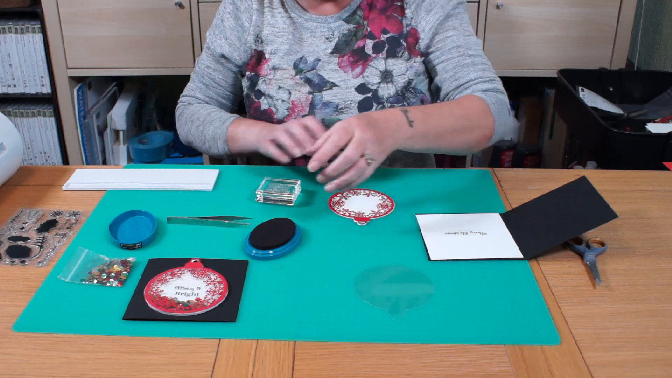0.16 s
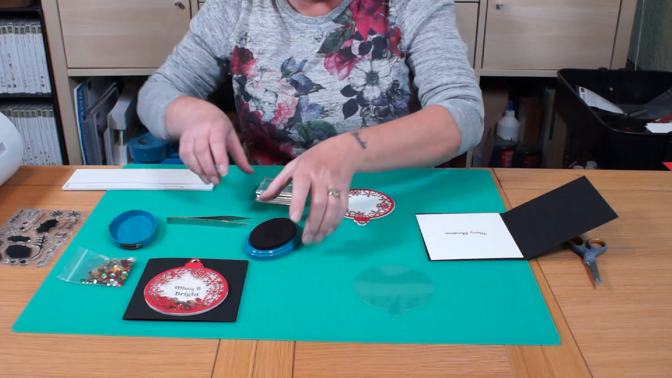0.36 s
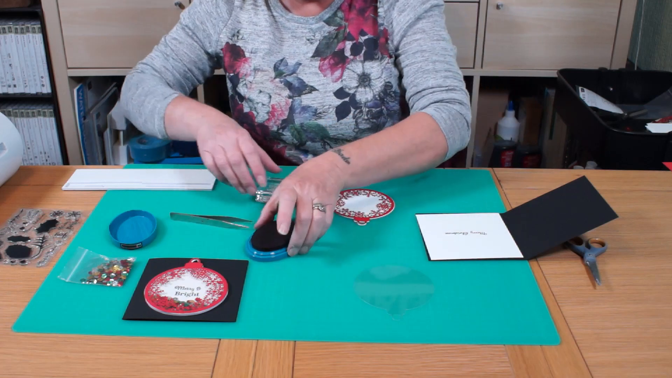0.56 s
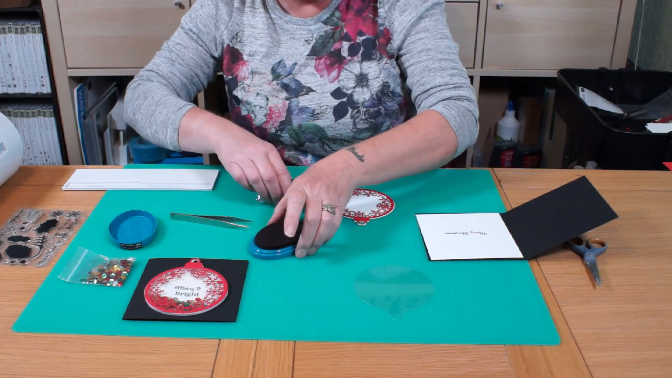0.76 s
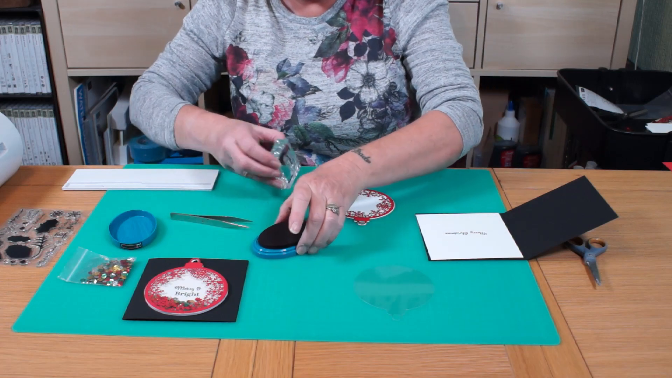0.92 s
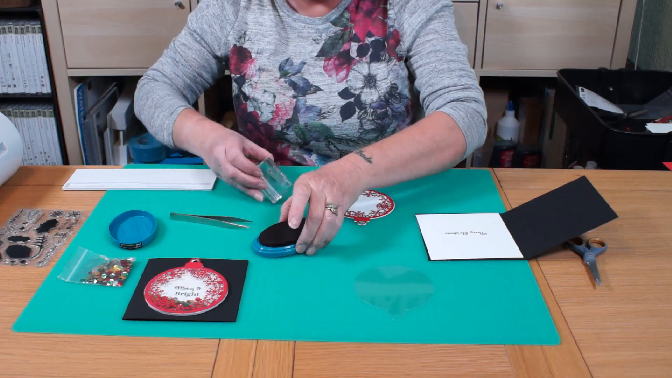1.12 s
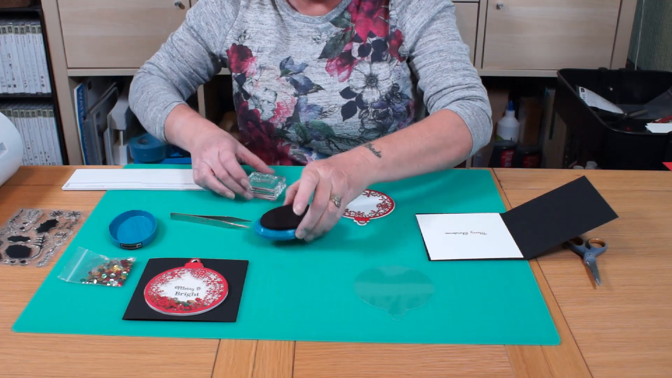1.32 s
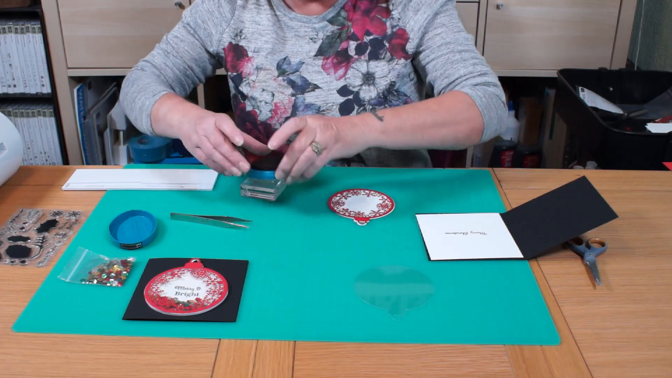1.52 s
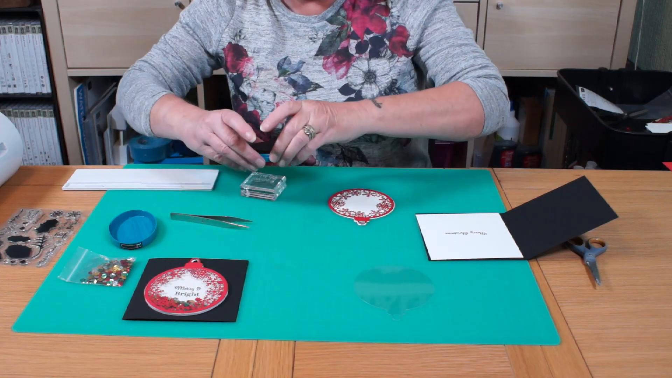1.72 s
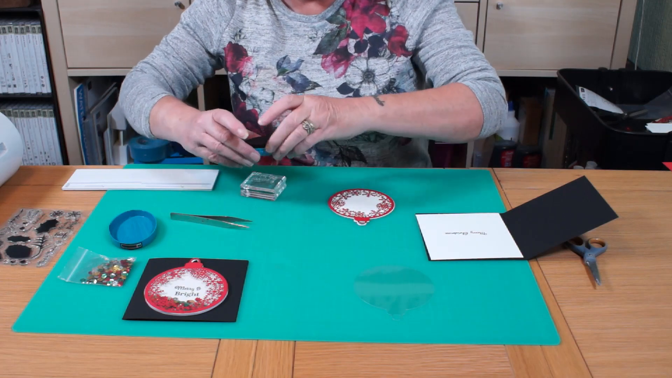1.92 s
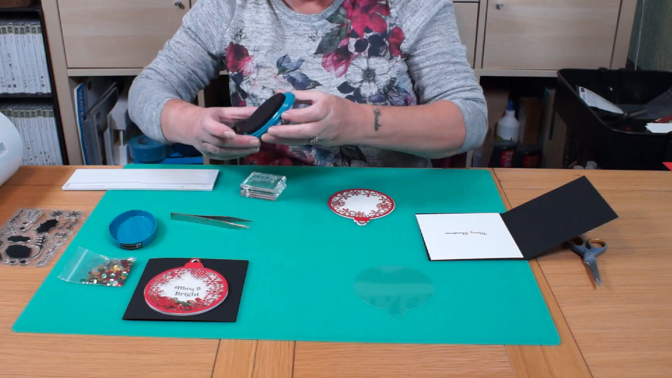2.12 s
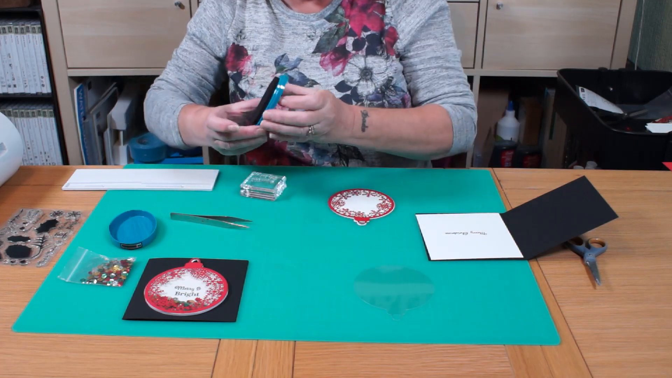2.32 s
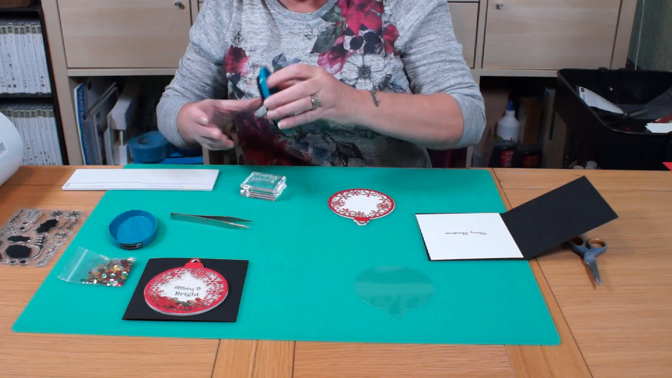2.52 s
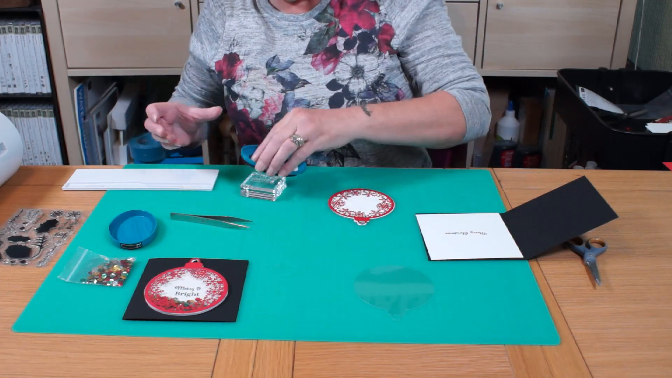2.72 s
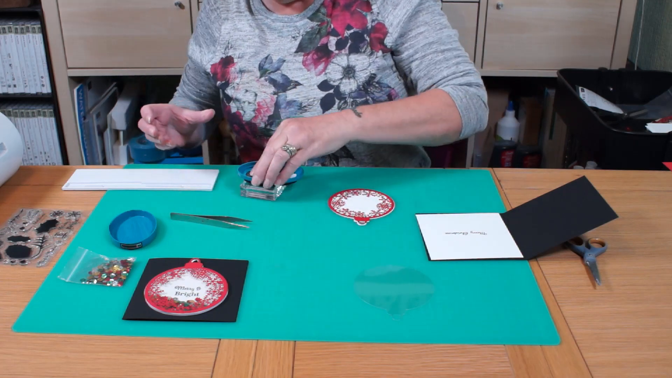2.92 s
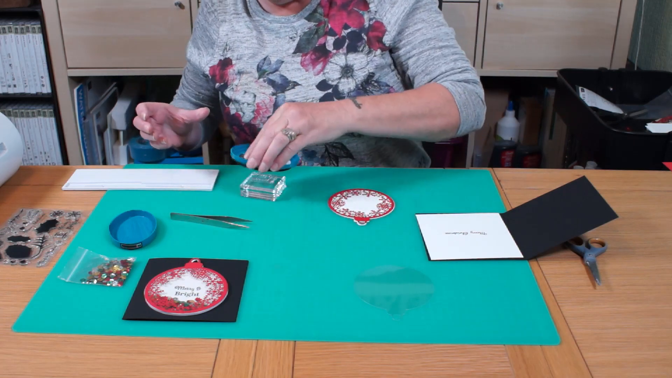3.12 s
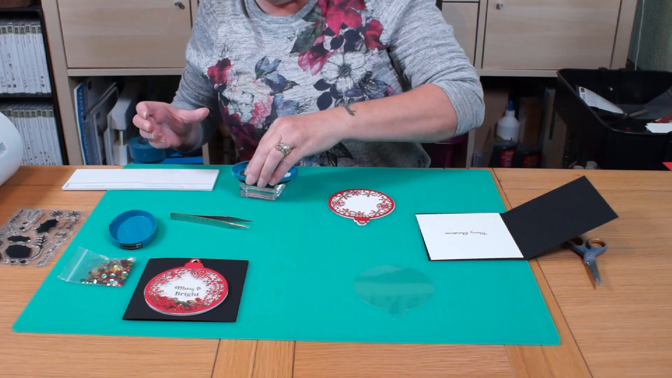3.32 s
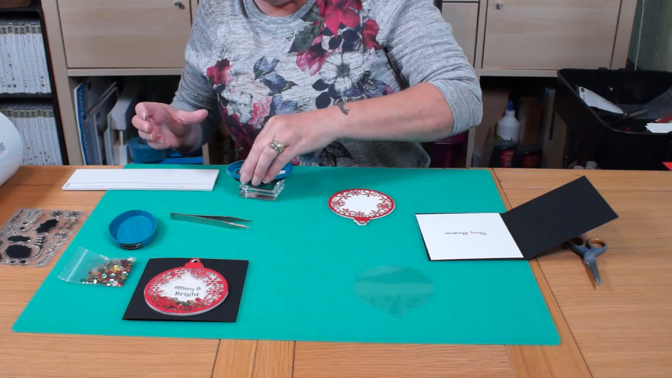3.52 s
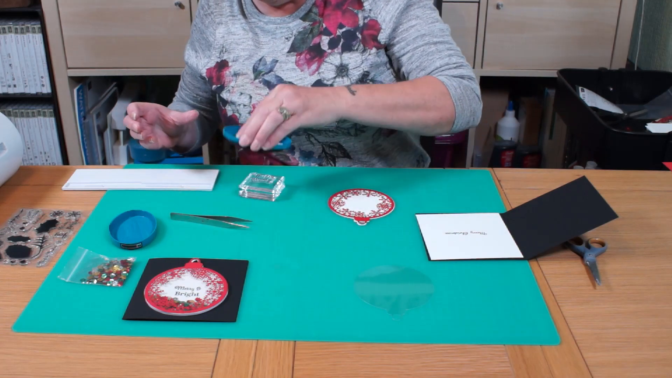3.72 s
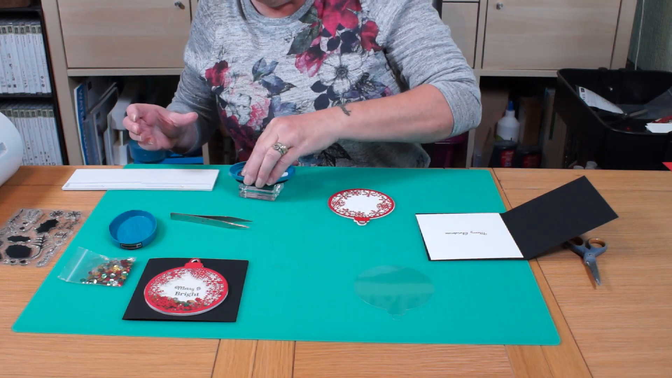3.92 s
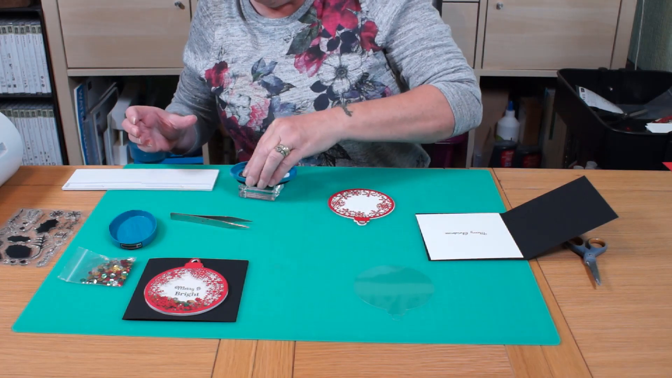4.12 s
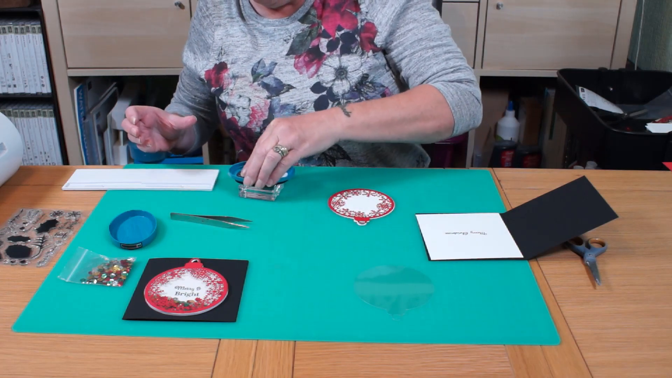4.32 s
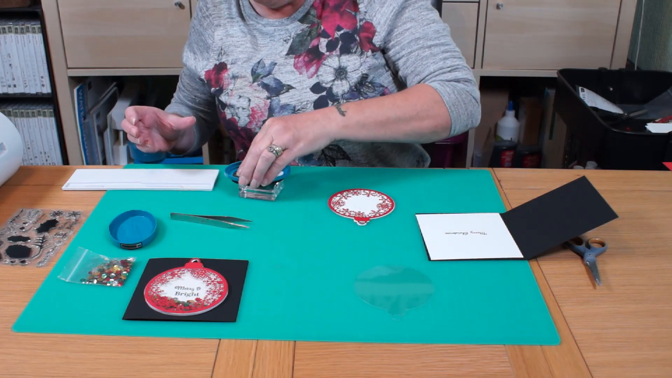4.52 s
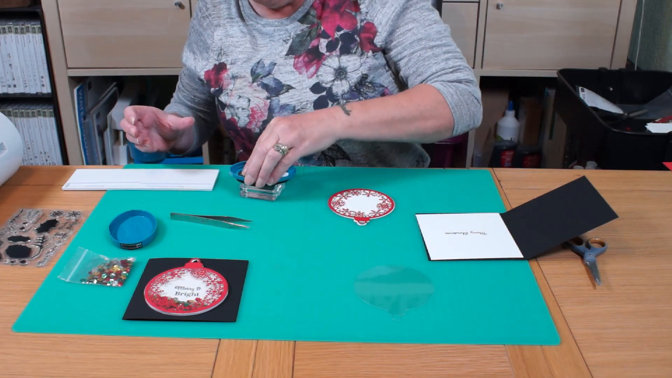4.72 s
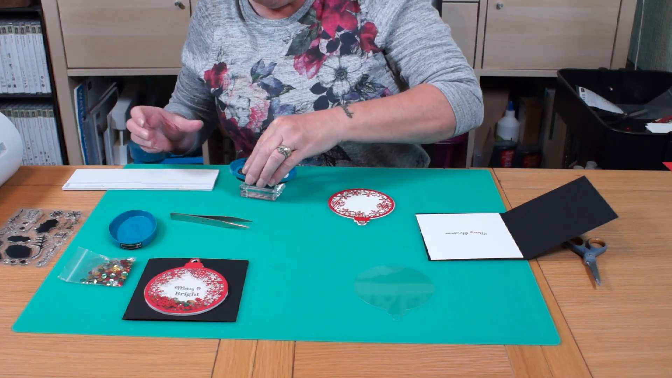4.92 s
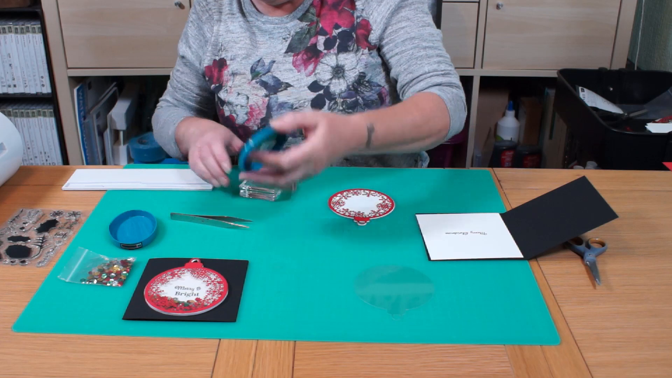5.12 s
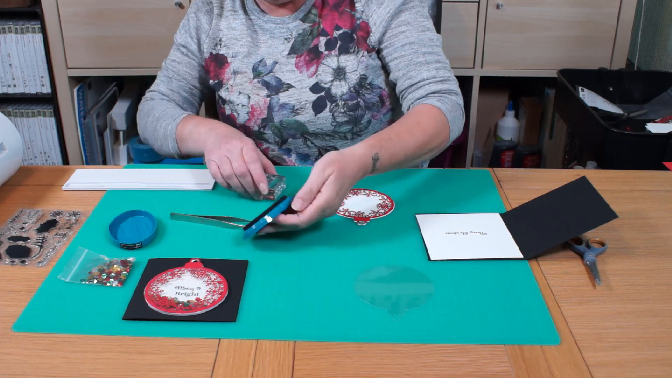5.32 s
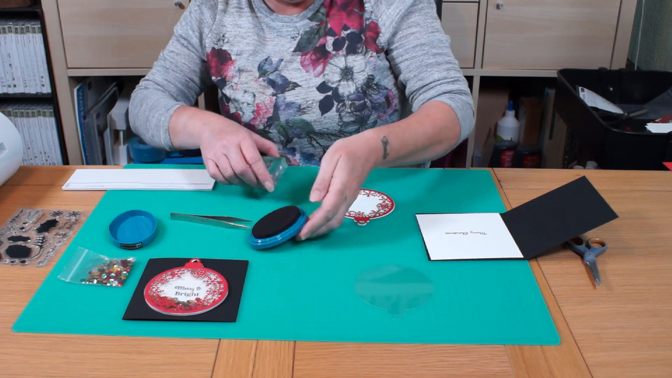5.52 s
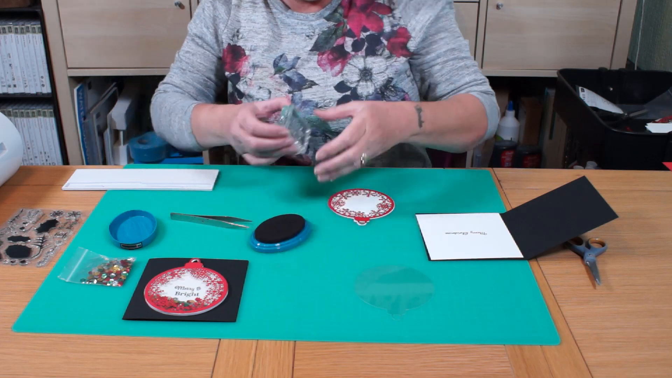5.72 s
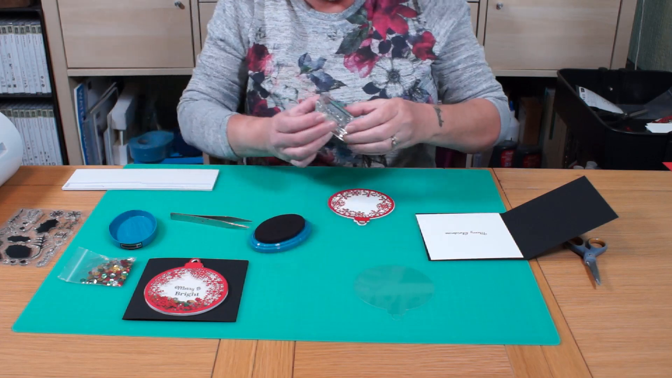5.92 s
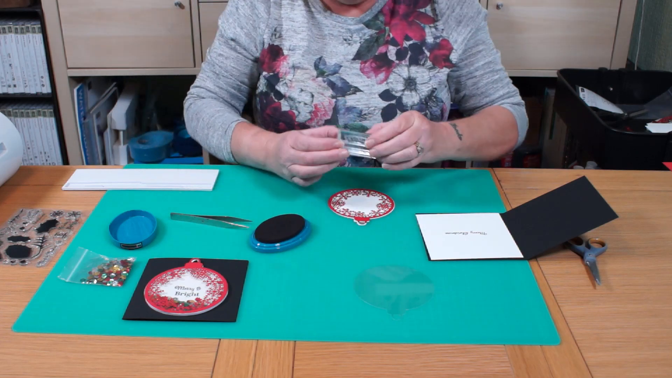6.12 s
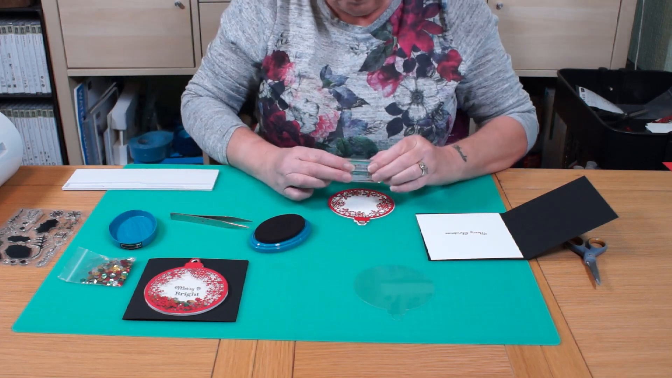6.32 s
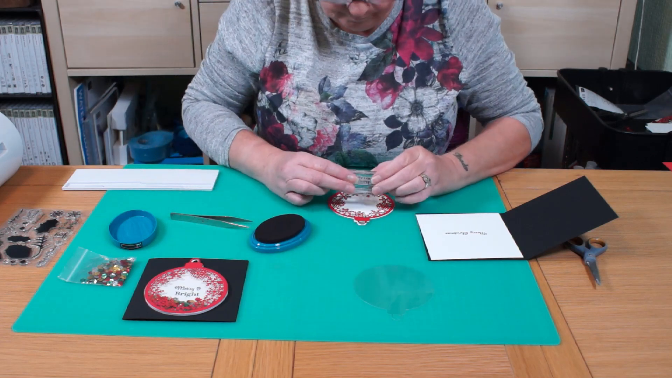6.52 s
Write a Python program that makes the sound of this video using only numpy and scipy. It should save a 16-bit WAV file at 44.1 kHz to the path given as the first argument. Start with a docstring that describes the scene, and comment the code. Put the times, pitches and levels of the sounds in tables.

```python
"""Over a faint room hush, fingers scrape and fumble with plastic at a craft table in a small, furnished room.
An ink pad and a clear acrylic stamp block are knocked down on the mat, then the pad is dabbed nine times
on the block. The pad drops and bounces, a fingertip squeaks on the acrylic, and the block is lifted.
Each blow draws a low, booming thud from table and room and a short clack from the plastic; the scrapes
are sprays of tiny friction slips."""
import sys
import numpy as np
from scipy import signal
from scipy.fft import rfft, irfft
from scipy.io import wavfile
from scipy.ndimage import uniform_filter1d

SR = 44100
rng = np.random.default_rng(int(sys.argv[2]) if len(sys.argv) > 2 else 0)


def transcribe(signal):
    """Save signal, clipped to [-1, 1], as a 16-bit WAV file at the path in sys.argv[1]."""
    frames = np.atleast_2d(signal).T
    limited = np.clip(frames, -1, 1)
    pcm = np.round(limited * 32767).astype(np.int16)
    wavfile.write(sys.argv[1], SR, pcm)


N = 289188

# Room rumble and microphone hiss. Each row: frequency in Hz, relative level in dB.
HUSH_COLOUR = [(15, -65), (25, -25), (69, -19.5), (101, -2.5), (124, -8.5), (178, -7), (296, -3.5),
               (336, -7), (518, -8.5), (603, -5.5), (668, -10), (862, -6.5), (1140, -10.5), (1760, -11),
               (11000, -22.5), (14300, -115), (22000, -120)]
# Stereo width of the hush. Each row: frequency in Hz, left-right correlation.
HUSH_CORRELATION = [(60, 1), (300, 0.23), (1000, 0.12), (3000, 0.05), (9000, 0.12)]
# Plastic pushed over the mat or scraped by fingers. Each row: peak time and length in seconds, level in dB.
SLIDES = [(0.024, 0.036, -41), (0.632, 0.068, -42.5), (0.794, 0.072, -50), (0.894, 0.054, -43.5),
          (5.36, 0.11, -48.5), (5.731, 0.035, -37.5), (6.0, 0.11, -60)]
# Tone of the friction. Each row: frequency in Hz, relative level in dB.
FRICTION_COLOUR = [(80, -35), (200, -3), (450, 4), (900, -1.5), (1800, -2.5), (3000, -8), (5000, -16),
                   (10000, -30)]
# Fingers and sleeves brushing about. Each row: start and end in seconds, level in dB.
FUMBLES = [(0.05, 0.6, -68), (5.55, 5.72, -57), (5.95, 6.55, -67)]
# Resonances of the table and the room together, heard as a low thud with a lingering boom.
# Each row: frequency in Hz, relative level in dB, 60 dB decay time in seconds.
THUD_RESONANCES = [(39, -17.5, 0.58), (66, -9.5, 0.42), (99.7, -18, 0.21), (155, -10.5, 0.18),
                   (178, -9.5, 0.17), (204, -16, 0.2), (236, -6, 0.085), (293, 2.5, 0.135),
                   (326.5, -9, 0.068), (341, 2, 0.085), (443.4, -10, 0.22), (515, -11, 0.23),
                   (570.3, -15, 0.24), (860, -16, .14), (974.3, -13, 0.13), (1135, -12, 0.12)]
# Tone of the plastic for each kind of contact. Each row: frequency in Hz, relative level in dB.
CLACK_COLOURS = {"dab": [(150, -37), (300, -6.5), (450, 6), (650, 1), (900, -1.5), (1250, 1.5), (1600, -7),
                 (2000, -10), (2400, -18), (2900, -22.5), (3600, -29), (4500, -35.5), (6500, -44),
                 (11000, -58)], "pad rim": [(55, -56), (110, -17), (200, -13.6), (380, -5.5), (600, -6),
                 (900, -4), (1400, -1.7), (1900, 2), (2500, -6.0), (3200, -16.5), (4200, -18.5),
                 (5500, -23), (7500, -31.5), (11000, -40.5)], "pad flat": [(40, -39), (80, -12.5),
                 (140, -7), (300, 1.5), (520, -1), (800, -8.5), (1150, -5), (1650, -4.5), (2100, -5.5),
                 (2800, -7.5), (3900, -10.5), (4800, -16.5), (7000, -20.5), (11000, -32)],
                 "block flat": [(40, -65), (80, -44), (150, -8), (330, -5), (520, -3.4), (750, -4.5),
                 (1000, -2.9), (1330, -4.5), (1700, -17), (2300, -17.1), (2900, -24.5), (4000, -24.5),
                 (6000, -34), (11000, -54)], "block edge": [(55, -46), (110, -9), (220, -8), (480, 1.5),
                 (750, -6), (1100, -7), (1450, -5), (1900, 1.2), (2350, -7), (2800, -17.5), (3800, -16.5),
                 (4800, -27.5), (7000, -30.5), (11000, -47)], "block corner": [(50, -60), (100, -17),
                 (200, -11.2), (400, -7), (650, -13), (950, 2.2), (1250, -2), (1700, -9.5), (2400, -9.5),
                 (3100, -15.5), (4200, -18.5), (5800, -28.9), (7800, -30), (11000, -43)]}
# Sharper rings of the plastic for each contact. Each row: frequency and width in Hz, boost or cut in dB.
CLACK_RINGS = {"dab": [(1300, 66, 1), (1910, 153, 1.5), (1850, 210, 4), (2450, 160, 4)],
               "pad rim": [(382, 28, 6), (1800, 190, -2), (4120, 83, 5)], "pad flat": [(1580, 75, 5),
               (2970, 110, 6.5), (3770, 250, 2.5)], "block flat": [(530.3, 50, 2), (970, 60, 0),
               (1210, 110, 3.5)], "block edge": [(1420, 66, 6), (1900, 110, -1.5), (2470, 180, 5)],
               "block corner": [(1010, 46, 0), (1260, 260, 4.5), (2480, 120, 9)]}
# Handling knocks. Each row: start in seconds, thud level in dB, clack level in dB, kind of contact.
KNOCKS = [(0.5607, -48.5, -53.5, "pad flat"), (0.6460, -48, -26.5, "pad rim"),
          (0.7669, -50, -51.5, "block flat"), (1.1420, -29.5, -24, "block flat"),
          (1.3335, -33.5, -29, "block edge"), (5.4179, -31, -24.5, "pad flat"),
          (5.6816, -43.5, -31, "block corner")]
# Landings after a knock. Each row: start in seconds, clack level in dB.
BOUNCES = [(1.1632, -37), (1.1850, -42), (5.4402, -42), (5.4690, -31.3), (5.6920, -42), (5.7200, -37.5),
           (5.7410, -39)]
# Dabs of the pad. Each row: start in seconds, thud level in dB, rim clack in dB relative to the thud
# (low when the pad lands flat on its felt).
DABS = [(2.9055, -36.5, -1.5), (3.2779, -28.7, -4), (3.5179, -30.7, -11), (3.9198, -32.5, -11),
        (4.1596, -26.5, -5), (4.3438, -32.5, -5.5), (4.5390, -33, -13), (4.756, -29.3, -6.5),
        (4.9172, -33.5, -4.5)]
# First reflections off the table and furniture. Each row: delay in seconds, left gain, right gain.
REFLECTIONS = [(.0007, 0.34, 0.33), (.0019, 1, 0.19), (.0033, 0.68, 1), (.0056, .4, 0.24),
               (.0105, 0.23, 0.46), (.0165, .3, 0.38), (.0215, .35, .25)]
# Length of the room's tail. Each row: frequency in Hz, 60 dB decay time in seconds.
ROOM_T60 = [(100, 0.44), (300, 0.2), (800, .24), (2000, 0.205), (5000, 0.27), (10000, 0.21)]
# Stereo width of the tail. Each row: frequency in Hz, left-right correlation.
ROOM_CORRELATION = [(60, 0.86), (300, 0.92), (600, 0.58), (1500, 0.48), (4000, 0.43), (9000, 0.2)]
# Stereo lean of the action. Each row: frequency in Hz, left minus right in dB.
BALANCE = [(60, 0.5), (150, -5), (330, 0.5), (650, -1.3), (1400, 1.5), (3000, 0.2), (9000, 0)]

RING_SAMPLES = 32768


def gain_of(db):
    """Decibels to amplitude."""
    return 10 ** (np.asarray(db) / 20)


def unit_rms(x):
    """Scales to an rms of one."""
    return x / np.sqrt(np.mean(x ** 2) + 1e-20)


def unit_blow(x):
    """Scales a blow so that its energy, spread over a twentieth of a second, has an rms of one."""
    return x / np.sqrt(np.sum(x ** 2) * 20 / SR + 1e-20)


def curve_at(points, hz):
    """Reads a curve along a log-frequency axis."""
    point_hz, value = np.transpose(points)
    return np.interp(np.log(hz + 1), np.log(point_hz + 1), value)


def add(mix, start_s, sound):
    """Mixes a sound in at its start time."""
    part = mix[max(round(start_s * SR), 0):][:len(sound)]
    part += sound[:len(part)]


def bins(size):
    """Frequencies in Hz for a spectrum of this many samples."""
    return np.fft.rfftfreq(size, 1 / SR)


def wander(samples):
    """A random drift with an rms of one, smoothed over this many samples."""
    return unit_rms(uniform_filter1d(rng.standard_normal(N), size=samples))


def ring_of(db):
    """A click through a body with this dB response, in minimum phase: sharp start, then decay."""
    log_gain = np.log(gain_of(np.maximum(db, db.max() - 100)))
    mirrored = np.r_[log_gain, log_gain[-2:0:-1]]
    return np.fft.ifft(np.exp(np.conj(signal.hilbert(mirrored)))).real


def stereo_pair(spectra, correlation):
    """Blends two unrelated spectra into a left and right with the given correlation."""
    mid = spectra[0] * np.sqrt((1 + correlation) / 2)
    side = spectra[1] * np.sqrt((1 - correlation) / 2)
    return np.array([mid + side, mid - side])


def hush(noise_db=-59, hum_hz=99.5, hum_db=-86):
    """A steady bed of room rumble, microphone hiss and faint mains hum."""
    hz = bins(N)
    spectra = stereo_pair(rfft(rng.standard_normal((2, N))), curve_at(HUSH_CORRELATION, hz))
    noise = irfft(spectra * gain_of(curve_at(HUSH_COLOUR, hz)), N)
    hum = np.sin(2 * np.pi * hum_hz * np.arange(N) / SR)
    return gain_of(noise_db) * unit_rms(noise) + gain_of(hum_db) * unit_rms(hum)


def friction(slips_per_s=2500):
    """A dense spray of tiny slips swells under each short slide and under the fumbling fingers."""
    pressure = fumbling()
    for peak_s, length_s, db in SLIDES:
        add(pressure, peak_s - length_s / 2, gain_of(db) * np.hanning(round(length_s * SR)))
    slips = rng.standard_normal(N) * (rng.random(N) < slips_per_s / SR)
    scrape = irfft(rfft(slips) * gain_of(curve_at(FRICTION_COLOUR, bins(N))), N)
    return pressure * unit_rms(scrape)


def fumbling(sway_db=3, fade_s=0.04):
    """The light, uneven pressure of busy hands, as an envelope for the friction."""
    t = np.arange(N) / SR
    pressure = np.zeros(N)
    for start_s, end_s, db in FUMBLES:
        pressure += gain_of(db) * np.clip(np.minimum(t - start_s, end_s - t) / fade_s, 0, 1)
    return pressure * gain_of(sway_db * wander(2500))


def thud(db, tilt_db_per_octave, cushion_hz=620, travel_s=0.001485, edge_s=0.009074, edge_gain=0.57):
    """A cushioned push sets table and room resonating together: a low thud with a lingering boom."""
    hz = bins(RING_SAMPLES) + 1
    power = 0
    for peak_hz, peak_db, t60 in THUD_RESONANCES:
        width_hz = np.log(1000) / np.pi / t60
        detuning = (hz ** 2 - peak_hz ** 2) / (hz * width_hz)
        power += gain_of(peak_db) ** 2 / (1 + detuning ** 2)
    cushion = 1 / (1 + (hz / cushion_hz) ** 4)
    ring = ring_of(10 * np.log10(power * cushion) + tilt_db_per_octave * np.log2(hz))
    # low bending waves travel slower; travel_s is their delay at 330 Hz, near the strongest resonances
    phase_lag = 4 * np.pi * travel_s * np.sqrt(330 * hz)
    # the wave comes back from the table's edge and holds the thud up for a few swings
    edge_echo = 1 + edge_gain * np.exp(-2j * np.pi * hz * edge_s)
    return gain_of(db) * unit_blow(irfft(rfft(ring) * edge_echo * np.exp(-1j * phase_lag)))


def clack(contact, db, chatter_s, tilt_db_per_octave=0, rebound_gain=0.95, rebounds=7):
    """A hard contact and a quick chatter of tiny rebounds ring the plastic."""
    hz = bins(RING_SAMPLES)
    colour_db = curve_at(CLACK_COLOURS[contact], hz) + tilt_db_per_octave * np.log2(1 + hz / 500)
    for ring_hz, width_hz, ring_db in CLACK_RINGS[contact]:
        colour_db += ring_db / (1 + (2 * (hz - ring_hz) / width_hz) ** 2)
    force = np.zeros(RING_SAMPLES)
    force[0] = 1
    for k, (jitter, strength) in enumerate(rng.random((rebounds, 2))):
        rebound_s = chatter_s * (k + jitter) / rebounds
        force[round(rebound_s * SR)] += (-1) ** k * rebound_gain * strength
    # the rebounds only ripple the spectrum; the plastic sets its broad shape
    force_db = 10 * np.log10(uniform_filter1d(abs(rfft(force)) ** 2, size=101) + 1e-9)
    ring = signal.fftconvolve(force, ring_of(colour_db - force_db))[:RING_SAMPLES]
    return gain_of(db) * unit_blow(ring)


def knocks(thuds, clacks, hardening=0.55):
    """Pad and block knock on the mat: the more clack, the harder the contact and the brighter its thud."""
    for start_s, thud_db, clack_db, contact in KNOCKS:
        add(thuds, start_s, thud(thud_db, tilt_db_per_octave=-1.2 + hardening * (clack_db - thud_db)))
        add(clacks, start_s, clack(contact, clack_db, chatter_s=0.0048))


def bounces(thuds, clacks, thud_offset_db=-13.5):
    """The piece last knocked down bounces or rocks and lands again, hardly moving the table."""
    for start_s, db in BOUNCES:
        contact = [kind for knock_s, _, _, kind in KNOCKS if knock_s < start_s][-1]
        add(thuds, start_s, thud(db + thud_offset_db, tilt_db_per_octave=-2))
        add(clacks, start_s, clack(contact, db, chatter_s=0.0026))


def dabs(thuds, clacks, usual_db=-31, felt_offset_db=-6, brightening=0.46, thinning=0.57):
    """The pad's felt touches the block first, then its case rocks over and the rim lands."""
    for start_s, db, rim_db in DABS:
        # a harder dab clacks brighter; a flatter one clacks thinner and its rim lands later
        tilt = -0.2 + brightening * (db - usual_db) - thinning * rim_db
        rim_lag_s = 0.0028 - 0.00015 * rim_db
        felt = clack("dab", db + rim_db + felt_offset_db, chatter_s=0.0028, tilt_db_per_octave=tilt)
        rim = clack("dab", db + rim_db, chatter_s=0.00406, tilt_db_per_octave=tilt)
        add(thuds, start_s, thud(db, tilt_db_per_octave=-0.8))
        add(clacks, start_s, felt)
        add(clacks, start_s + rim_lag_s, rim)


def squeak(peak_s=5.654, hz=1900, db=-41, rise_s=0.016, fall_s=0.004, waver=0.035):
    """A fingertip drags on the acrylic: an unsteady stick-slip tone builds, then stops as it lets go."""
    t = np.arange(N) / SR - peak_s
    grip = np.exp(-abs(t / np.where(t < 0, rise_s, fall_s)))
    pitch_hz = hz * (1 + waver * wander(90))
    tone = np.sin(2 * np.pi * np.cumsum(pitch_hz) / SR)
    return gain_of(db) * grip * unit_rms(tone)


def room_response(tail_db, reflection_db, onset_s=0.0027, build_s=0.00067):
    """Direct sound, first reflections and a short diffuse tail that lingers longest in the bass."""
    t = np.arange(RING_SAMPLES) / SR
    hz, frame_s, noise = signal.stft(rng.standard_normal((2, RING_SAMPLES)), SR, nperseg=256)
    noise = stereo_pair(noise, curve_at(ROOM_CORRELATION, hz)[:, None])
    decay = gain_of(-60 * frame_s / curve_at(ROOM_T60, hz)[:, None])
    tail = signal.istft(noise * decay, SR, nperseg=256)[1][:, :RING_SAMPLES]
    tail *= 1 - np.exp(-np.maximum(t - onset_s, 0) / build_s)
    response = gain_of(tail_db) * tail / np.linalg.norm(tail[0])
    response[:, 0] += 1  # direct sound
    for delay_s, *gains in REFLECTIONS:
        response[:, round(delay_s * SR)] += gain_of(reflection_db) * np.array(gains)
    response /= np.linalg.norm(response, axis=1, keepdims=True)
    # the room passes about the same energy in every band and adds only a fine ripple
    power = (abs(rfft(response)) ** 2).mean(0)
    band_db = 10 * np.log10(uniform_filter1d(power, size=61) + 1e-12)
    return signal.fftconvolve(response, ring_of(-band_db)[None], axes=1)[:, :RING_SAMPLES]


def room(sound, tail_db, reflection_db, poses):
    """Moving hands and arms change the paths through the room: crossfades one response per pose."""
    pose = np.linspace(0, poses - 1, N)
    heard = np.zeros((2, N))
    for k in range(poses):
        fade = np.sqrt(np.maximum(1 - abs(pose - k), 0))
        response = room_response(tail_db, reflection_db)
        heard += signal.oaconvolve((sound * fade)[None], response, axes=1)[:, :N]
    return heard


def scene():
    """The thuds stay fairly dry, while the small plastic parts are heard mostly by way of the room."""
    thuds, clacks = np.zeros((2, N))
    dabs(thuds, clacks)
    knocks(thuds, clacks)
    bounces(thuds, clacks)
    low_end = room(thuds, tail_db=-3.5, reflection_db=-12, poses=1)
    plastic = room(clacks + friction() + squeak(), tail_db=9.0, reflection_db=1.5, poses=12)
    lean_db = curve_at(BALANCE, bins(N)) / 2
    action = irfft(rfft(low_end + plastic) * gain_of([lean_db, -lean_db]), N)
    return action + hush()


def record(dry):
    """A steep low-pass takes off the air above 11.2 kHz."""
    low_pass = signal.firwin(401, 11200, window=("kaiser", 8), fs=SR)
    return signal.oaconvolve(dry, low_pass[None], "same")


dry = scene()
out = record(dry)
transcribe(out)
```